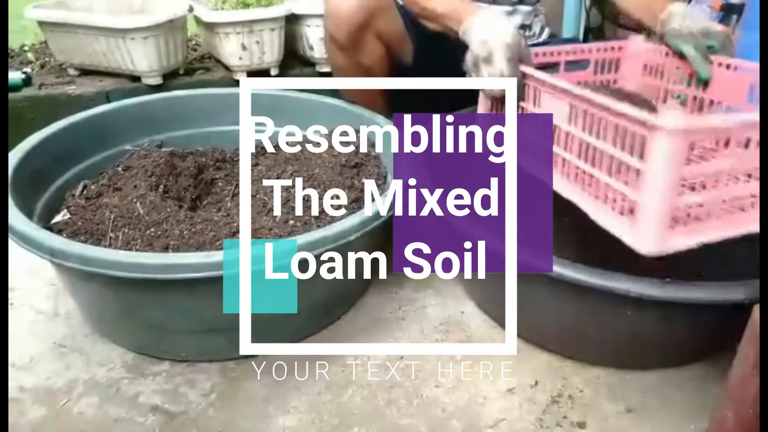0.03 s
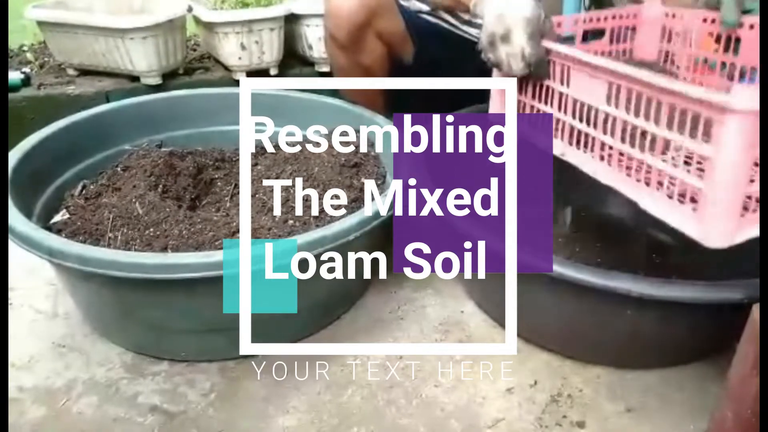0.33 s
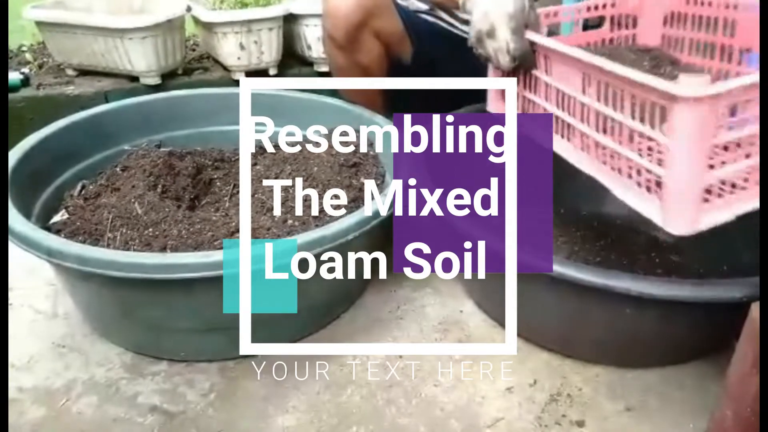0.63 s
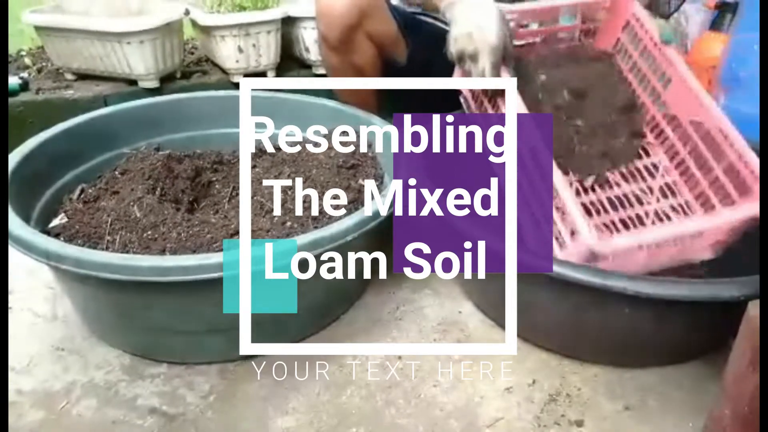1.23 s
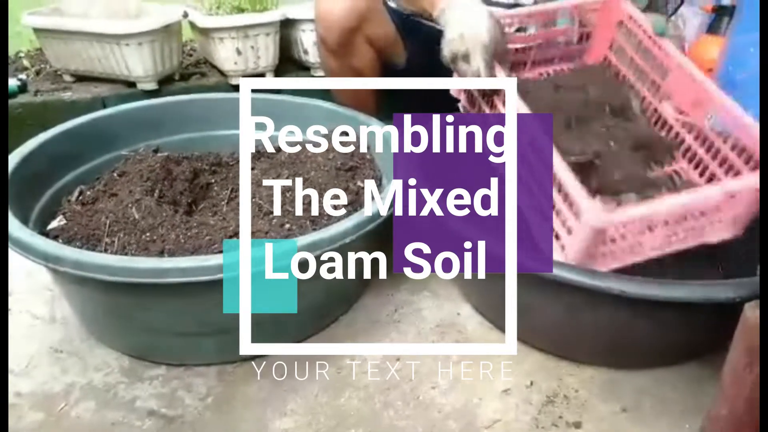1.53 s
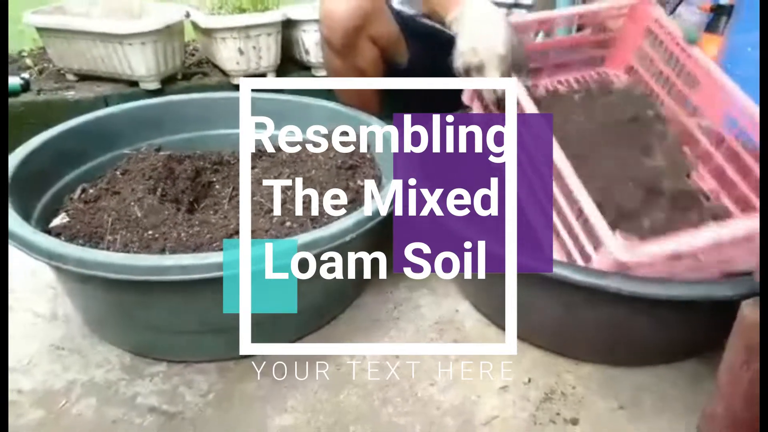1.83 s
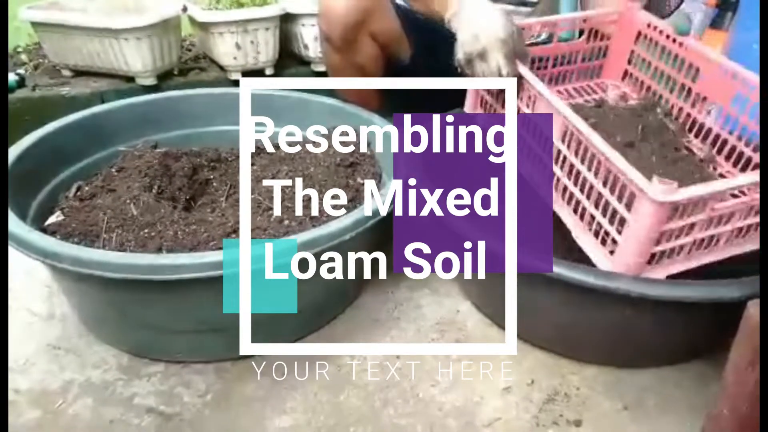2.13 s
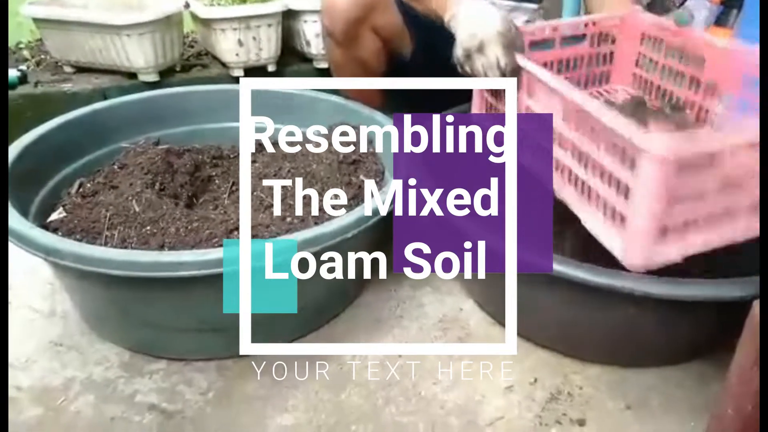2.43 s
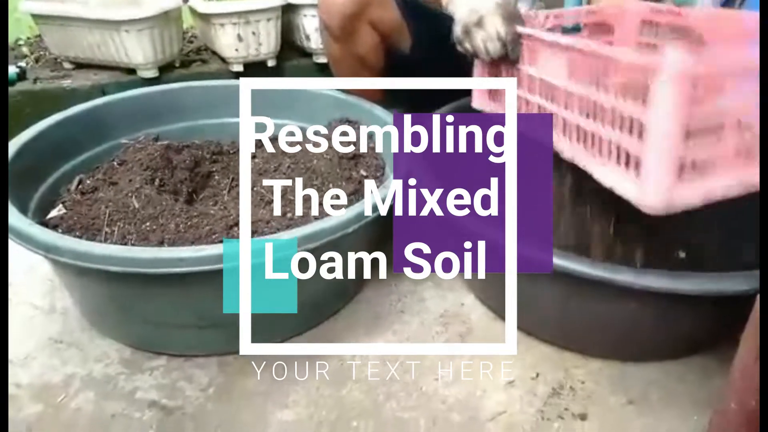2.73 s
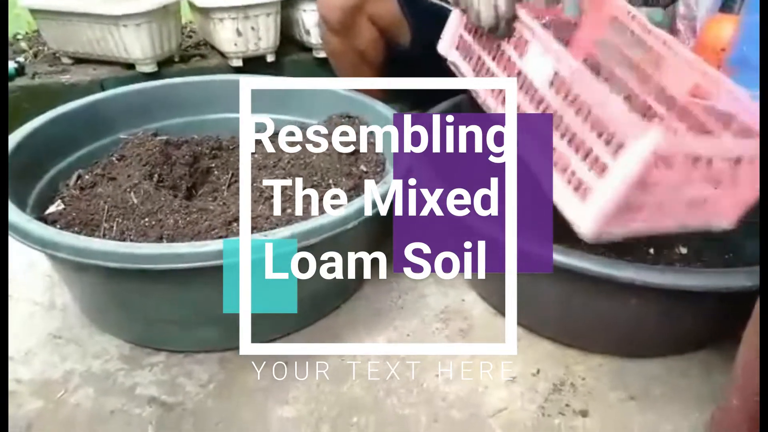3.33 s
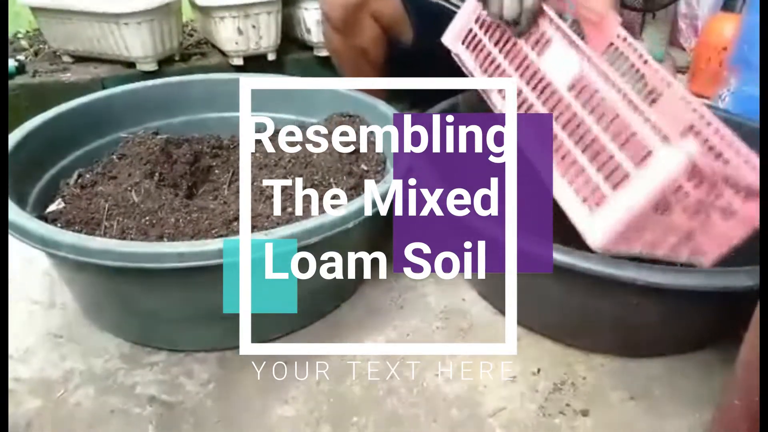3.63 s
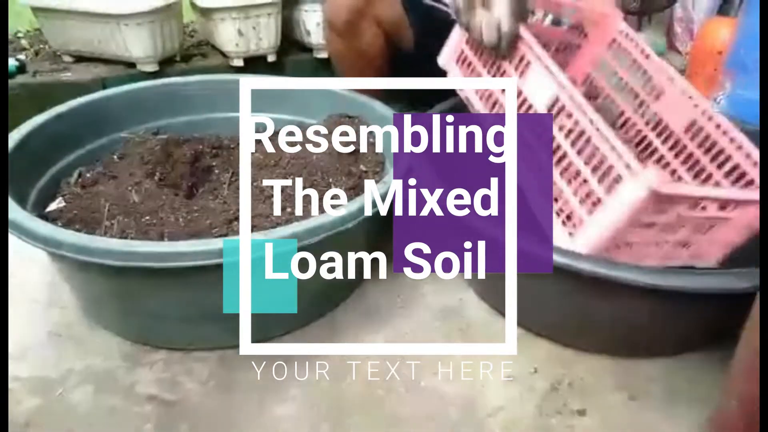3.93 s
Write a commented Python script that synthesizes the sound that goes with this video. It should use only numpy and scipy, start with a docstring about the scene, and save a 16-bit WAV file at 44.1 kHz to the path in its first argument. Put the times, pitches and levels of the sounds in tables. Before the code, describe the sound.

Soil hisses through a shaken plastic crate while clods roll and the crate knocks on a tub's rim. The plastic groans, pauses, then shakes on with a hollow boom, slightly to the right in still outdoor air.

```python
"""Hissing, tumbling and knocking: loose soil is sieved in a plastic crate over a tub, outdoors.
Fine grains hiss through the slots, crumbs tick on the slats and clods roll on the crate's floor.
The shaken crate knocks on the rim, its lattice clacks, and once it lands heavily on the booming tub.
Loaded plastic groans; two brief, thin, flickering high tones sound near 0.8 s.
The shaking rests for a moment while the crate is tipped."""
import sys
import numpy as np
from scipy import signal
from scipy.fft import rfft, irfft, next_fast_len
from scipy.io import wavfile

SR = 44100
rng = np.random.default_rng(int(sys.argv[2]) if len(sys.argv) > 2 else 0)


def unload_wav(signal):
    """Save mono or channel-first audio to the path in sys.argv[1] as 16-bit WAV at rate SR, clipped to [-1, 1]."""
    wavfile.write(
        sys.argv[1],
        SR,
        np.round(np.clip(np.atleast_2d(signal).T, -1, 1) * 32767).astype(np.int16),
    )


N = 176400
TIME = np.arange(N) / SR
HIT_T = np.arange(int(0.2 * SR)) / SR

# soil flow through the slots: t/s, level/dB
SOIL_FLOW = [(0, -33.5), (0.09, -45), (0.2, -32), (0.31, -43.5), (0.44, -41.5), (0.6, -46), (0.68, -51.5),
             (0.85, -62.5), (0.89, -78), (1.0, -97), (1.09, -79), (1.14, -57), (1.2, -50), (1.28, -51),
             (1.36, -31.5), (1.44, -35), (1.51, -42), (1.55, -31.5), (1.59, -35.5), (1.66, -27),
             (1.79, -43), (1.9, -31), (2.0, -34.5), (2.15, -40.5), (2.24, -46), (2.45, -50), (2.56, -34),
             (2.69, -38.5), (2.775, -41), (2.85, -37.5), (2.955, -40), (3.0, -33.5), (3.1, -45),
             (3.26, -37), (3.335, -41), (3.39, -31.5), (3.52, -38), (3.6, -47), (3.69, -35), (3.75, -37),
             (3.81, -38), (3.86, -34), (4.0, -35.5)]
# crate modes: f/Hz, level/dB, t60/s
CRATE_MODES = [(301.4, -11, 0.25), (554, -7.5, 0.42), (613, 2.5, 0.11), (722, 2, 0.072), (808, 1, 0.1),
               (900, -1, 0.16), (1006, 1, 0.088), (1300, -3.5, 0.048), (1401, -1.5, 0.16)]
# stereo width: f/Hz, side over mid/dB
STEREO_WIDTH = [(50, -17), (200, -13), (450, -7), (800, -5), (1100, 1.5), (1600, 2.5), (12000, 0)]


def from_db(db):
    """Decibels to gain."""
    return 10 ** (np.asarray(db) / 20)


def unit_rms(x):
    """Scale to unit power."""
    return x / np.sqrt(np.mean(x ** 2) + 1e-20)


def unit_hit(x):
    """Scale to unit power over the first 12 ms."""
    return x / np.sqrt(np.mean(x[:, :int(0.012 * SR)] ** 2))


def envelope(curve):
    """Gain over time from rows of t/s, level/dB."""
    return from_db(np.interp(TIME, *np.transpose(curve)))


def db_at(spectrum, hz):
    """Read a spectrum on a log-frequency axis."""
    knots_hz, db = np.transpose(spectrum)
    return np.interp(np.log(hz + 1), np.log(knots_hz), db)


def decay(t, t60_s):
    """Exponential decay."""
    return np.exp(-np.log(1000) * t / max(t60_s, 1e-3))


def drift(corner_hz):
    """Slow random wander of spread 1."""
    step, settle = 40, 500
    pole = np.exp(-2 * np.pi * corner_hz * step / SR)
    noise = rng.standard_normal(N // step + settle + 2)
    slow = signal.lfilter([1], [1, -2 * pole, pole * pole], noise)[settle:]
    return np.interp(np.arange(N) / step, np.arange(len(slow)), unit_rms(slow))


def coloured(pair, spectrum, focus_hz=1000, focus_db=0, tilt_db_oct=0):
    """Minimum-phase filter with a broad peak and treble tilt; mid and side in, left and right out."""
    n = pair.shape[1]
    size = 2 * next_fast_len(n // 2 + 2048)
    hz = np.arange(size // 2 + 1) * SR / size
    peak_db = focus_db * np.exp(-(2 * np.log2((hz + 1) / focus_hz)) ** 2)
    treble_db = tilt_db_oct * np.log2(np.maximum(hz / 2500, 1))
    cepstrum = irfft(np.log(from_db(db_at(spectrum, hz) + peak_db + treble_db)))
    cepstrum[1:size // 2] *= 2
    cepstrum[size // 2 + 1:] = 0
    width = from_db(db_at(STEREO_WIDTH, hz))
    mid, side = rfft(pair, size) * np.exp(rfft(cepstrum)) / np.hypot(1, width)
    return irfft(np.array([mid + width * side, mid - width * side]))[:, :n]


def ring(force, hz, t60_s):
    """Resonator: a unit click starts a decaying sine of height 1."""
    r, w = from_db(-60 / (t60_s * SR)), 2 * np.pi * hz / SR
    return signal.lfilter([0, np.sin(w)], [1, -2 * r * np.cos(w), r * r], force + 1e-18)


def mode_pair(hz, t60_s):
    """One decaying mode; left and right differ in phase by the stereo width."""
    offset = np.arctan(from_db(db_at(STEREO_WIDTH, hz))) * rng.choice([-1, 1]) * np.array([[1], [-1]])
    return np.sin(2 * np.pi * (hz * HIT_T + rng.random()) + offset) * decay(HIT_T, t60_s)


def grains(per_s, t60_s, spread_db, dust_share):
    """Random impacts of uneven size, each a tiny noise burst, over smooth dust."""
    sizes = from_db(spread_db * np.minimum(rng.exponential(1, N), 5))
    impacts = rng.random(N) < per_s / SR
    power = signal.lfilter([1], [1, -decay(2 / SR, t60_s)], impacts * sizes ** 2 + 1e-18)
    return np.sqrt(dust_share + (1 - dust_share) * power / power.mean()) * rng.standard_normal((2, N))


def burst(attack_s, t60_s, tail_db):
    """Dense ring of one blow, with a tail of scatter from the tub and the yard."""
    fall = np.hypot(decay(HIT_T, t60_s), from_db(tail_db) * decay(HIT_T, t60_s=0.27))
    return (1 - np.exp(-HIT_T / attack_s)) * fall * rng.standard_normal((2, len(HIT_T)))


def add(out, start_s, sound):
    """Mix a sound in at its time."""
    i = int(start_s * SR)
    out[:, i:i + sound.shape[1]] += sound[:, :N - i]


def air():
    """Still outdoor air: faint, steady noise."""
    # air spectrum: f/Hz, level/dB
    spectrum = [(25, -17), (110, 4.5), (250, -17), (600, -20), (1500, -19), (5000, -19), (13000, -42)]
    return from_db(-76.5) * unit_rms(coloured(rng.standard_normal((2, N)), spectrum))


def groans_and_thin_tones():
    """Loaded plastic groans; two brief, thin, flickering high tones sound near 0.8 s."""
    # groans and the two tones above 1500 Hz: t/s, length/s, start f/Hz, end f/Hz, level/dB
    glides = [(0.331, 0.15, 599, 499, -39.5), (0.538, 0.33, 397, 396, -43.5), (0.672, 0.1, 517, 515, -42),
              (0.788, 0.081, 5060, 5180, -47), (0.81, 0.053, 1830, 1780, -52.5),
              (1.148, 0.1, 1020, 960, -58)]
    out, flicker_hz = 0, 42
    for start_s, length_s, start_hz, end_hz, db in glides:
        progress = np.clip((TIME - start_s) / length_s, 0, 1)
        phase = 2 * np.pi * np.cumsum(start_hz + (end_hz - start_hz) * progress) / SR
        tone = unit_rms(drift(flicker_hz) * np.sin(phase) + drift(flicker_hz) * np.cos(phase))
        swell = 2 * np.sqrt(progress * (1 - progress))
        out += from_db(db) * swell * tone
    return out


def tub():
    """The tub booms under the landing crate and rumbles under falling soil."""
    # crate landings: t/s, level/dB
    landings = [(1.815, -3.5), (1.8315, -11.5), (2.97, -23), (3.452, -21), (3.973, -32)]
    # tub modes: f/Hz, level/dB, t60/s
    modes = [(81, -16.5, 0.25), (116.5, -19, 0.2), (179.3, -14.5, 0.2), (305, 11, 0.019), (404, 2, 0.025),
             (521, 3, 0.055), (750, -2, 0.042)]
    # rumble under the soil: t/s, level/dB
    rumble_curve = [(0, -48.5), (0.25, -43), (0.36, -65), (0.57, -71), (0.85, -66), (0.92, -92), (1.1, -88),
                    (1.27, -75), (1.35, -34), (1.53, -46), (1.63, -39.5), (1.78, -41.5), (1.88, -31.5),
                    (2.15, -45.5), (2.23, -66), (2.44, -56), (2.54, -28), (2.7, -46), (2.98, -44.5),
                    (3.13, -50), (3.46, -35), (3.62, -50.5), (3.74, -49), (4.0, -35.5)]
    # tub noise spectrum: f/Hz, level/dB
    spectrum = [(20, -46), (45, -31.5), (75, 5), (110, 7.5), (150, 3.5), (210, 9.5), (320, 18.5),
                (700, -26)]
    out = np.zeros((2, N))
    boom = sum(from_db(db) * np.sin(2 * np.pi * hz * HIT_T) * decay(HIT_T, t60_s)
               for hz, db, t60_s in modes)
    boom *= np.exp(-HIT_T / 0.004) - 1
    for start_s, db in landings:
        blow = burst(attack_s=0.00082, t60_s=0.067, tail_db=-18)
        rattle = unit_hit(coloured(blow, spectrum, focus_hz=467, focus_db=21))
        add(out, start_s, from_db(db) * (boom + from_db(-14) * rattle))
    soil = grains(per_s=40, t60_s=0.059, spread_db=2.2, dust_share=0.44)
    rumble = from_db(1) * envelope(rumble_curve) * unit_rms(coloured(soil, spectrum))
    # the tub still rings, unevenly, as the scene opens
    hum_hz, hum_fade_s = 114, 0.12
    hum_db = -34 + 4 * drift(corner_hz=25)
    hum = from_db(hum_db) * np.sin(2 * np.pi * hum_hz * TIME) * np.exp(-(TIME / hum_fade_s) ** 2)
    return out + hum + rumble


def clacks():
    """The lattice catches on the rim and snaps free: a crack, ringing ribs, then duller scatter."""
    # lattice snaps: t/s, relative level/dB, treble tilt/(dB/octave), t60/s
    snaps = [(0.002, -28, -2.5, 0.032), (0.1569, -33.5, -2.5, 0.03), (0.1779, -20, -3, 0.0095),
             (0.2354, -32.5, 5, 0.045), (0.285, -32, -34, 0.006), (0.3257, -31, -1, 0.012),
             (0.511, -38, -11, 0.023), (1.296, -35.5, -6, 0.032), (1.318, -24.5, 0.5, 0.036),
             (1.3396, -32.5, -2, 0.027), (1.3803, -34.5, 8, 0.028), (1.5227, -28, -2.5, 0.039),
             (1.5847, -32, -11, 0.035), (1.6039, -23.5, 8, 0.076), (1.6147, -20, 3.5, 0.075),
             (1.744, -26, 1, 0.055), (1.8132, -26, 4, 0.032), (1.8683, -20, -1, 0.015),
             (2.101, -29.5, 5, 0.078), (2.4921, -28.5, -5.5, 0.026), (2.518, -30, 6, 0.049),
             (2.5295, -21.5, 8, 0.043), (2.75, -27.5, 1.5, 0.021), (2.791, -21.5, 0, 0.024),
             (2.814, -19.5, -3.5, 0.055), (2.833, -26.5, 3, 0.049), (2.9708, -18, 3.5, 0.013),
             (3.019, -24, -2, 0.061), (3.0793, -33.5, 4.5, 0.041), (3.2089, -32.5, -22, 0.042),
             (3.35, -26.5, -8.5, 0.11), (3.3875, -32, 4, 0.023), (3.509, -25.5, -6.5, 0.005),
             (3.729, -19.5, -2.5, 0.12), (3.931, -29.5, 4, 0.043), (3.971, -21.5, 0, 0.099)]
    # clack spectrum: f/Hz, level/dB
    spectrum = [(100, -19), (600, 2), (1500, 1.5), (3000, 2.5), (5000, 5), (6800, -3.5), (8500, -10.5),
                (13000, -22)]
    gain_db, attack_s, crack_delay_s, crack_width_s = 5, 0.0007, 0.0018, 0.0013
    out = np.zeros((2, N))
    lowpass = signal.butter(4, 6500, fs=SR, output="sos")
    rise = 1 - np.exp(-HIT_T / attack_s)
    crack_shape = np.exp(-((HIT_T - crack_delay_s) / crack_width_s) ** 2)
    for start_s, db, tilt, t60_s in snaps:
        ribs = rise * sum(mode_pair(hz, t60_s=0.032) for hz in rng.uniform(1500, 12000, size=12))
        crack = crack_shape * rng.standard_normal((2, len(HIT_T)))
        scatter = signal.sosfilt(lowpass, burst(attack_s, t60_s, tail_db=-9))
        snap = scatter + from_db(-7) * unit_hit(ribs) + from_db(-1.5) * crack
        add(out, start_s, from_db(db + gain_db) * unit_hit(coloured(snap, spectrum, tilt_db_oct=tilt)))
    return out


def knocks():
    """A struck panel rings and wakes nearby crate modes; the shifting load damps and detunes them."""
    # dull blows on the rim: t/s, relative level/dB, panel f/Hz, t60/s
    blows = [(0.158, -27, 950, 0.029), (0.177, -13, 787, 0.038), (0.186, -12.5, 682, 0.054),
             (0.333, -17.5, 1030, 0.027), (0.564, -18, 720, 0.027), (1.316, -16.5, 905, 0.035),
             (1.338, -10, 828, 0.046), (1.363, -18, 730, .045), (1.521, -18.5, 930, 0.019),
             (1.602, -11.5, 970, 0.052), (1.647, -16, 858, 0.19), (1.672, -18.5, 564, 0.032),
             (1.714, -16.5, 847, 0.023), (1.814, -11, 1046, 0.036), (1.906, -11.5, 594, 0.026),
             (1.931, -16, 746, 0.061), (1.966, -10.5, 1062, 0.043), (2.045, -21.5, 1020, 0.03),
             (2.13, -9.5, 1307, 0.021), (2.376, -27, 940, 0.036), (2.476, -13, 624, 0.1),
             (2.493, -7.5, 567, 0.072), (2.508, -12.5, 996, 0.046), (2.551, -12, 970, 0.095),
             (2.567, -15.5, 557, 0.063), (2.752, -10, 549, 0.065), (2.793, -13, 1304, 0.037),
             (2.957, -16.5, 800, 0.032), (2.971, -10.5, 1024, 0.013), (3.261, -15.5, 835, 0.07),
             (3.308, -18.5, 1400, 0.024), (3.403, -13, 924, 0.036), (3.448, -10, 798, 0.05),
             (3.485, -16, 362, 0.094), (3.701, -15, 1040, 0.078), (3.731, -10, 1310, 0.033),
             (3.838, -13, 832, 0.077), (3.883, -21, 710, 0.042), (3.935, -18, 796, 0.024),
             (3.972, -6, 845, 0.056)]
    # thud spectrum: f/Hz, level/dB
    spectrum = [(30, -40), (150, -21.5), (300, -8.5), (550, -10), (1000, 1.5), (1500, -6), (2500, -12),
                (6000, -47.5)]
    gain_db, attack_s, falloff_db_oct = -6, 0.0015, 10
    free_t60_s = 0.06   # a blow this long leaves the modes their own t60
    out = np.zeros((2, N))
    rise = 1 - np.exp(-HIT_T / attack_s)
    for start_s, db, panel_hz, t60_s in blows:
        thud = coloured(burst(attack_s, t60_s, tail_db=-18), spectrum, focus_hz=panel_hz, focus_db=3)
        rings = 0
        for hz, mode_db, mode_t60_s in CRATE_MODES:
            drive_db = mode_db - falloff_db_oct * abs(np.log2(hz / panel_hz)) + rng.normal(0, 1.7)
            detuned_hz = hz * rng.normal(1, 0.012)
            rings += from_db(drive_db) * mode_pair(detuned_hz, mode_t60_s * t60_s / free_t60_s)
        panel = mode_pair(panel_hz, 1.09 * t60_s)
        knock = unit_hit(thud) + from_db(-3) * unit_hit(rise * rings) + unit_hit(rise * panel)
        add(out, start_s, from_db(db + gain_db) * unit_hit(knock))
    return out


def tumbling():
    """Clods roll over the crate's floor and set its modes ringing."""
    # clod motion: t/s, level/dB
    motion = [(0, -28.5), (0.1, -39), (0.21, -26.5), (0.27, -49.5), (0.44, -30.5), (0.52, -40), (0.58, -29),
              (0.67, -44), (0.74, -38), (0.85, -58), (0.9, -75.5), (1.0, -93), (1.12, -82), (1.18, -61.5),
              (1.27, -43), (1.36, -26), (1.48, -36.5), (1.56, -34), (1.66, -22), (1.78, -32), (1.92, -23),
              (2.05, -33), (2.18, -32.5), (2.26, -50.5), (2.45, -40.5), (2.53, -21.5), (2.62, -32.5),
              (2.72, -40), (2.82, -34.5), (2.89, -35.5), (3.0, -30.5), (3.08, -48.5), (3.15, -40.5),
              (3.24, -31), (3.33, -32), (3.47, -28.5), (3.58, -41.5), (3.66, -40.5), (3.73, -30),
              (3.81, -47), (3.86, -26.5), (4.0, -31)]
    # clod impact spectrum: f/Hz, level/dB
    spectrum = [(100, -20.5), (200, -19), (330, -5), (550, 4), (950, 6.5), (1300, 5), (2000, -5.5),
                (4000, -29)]
    force = coloured(grains(per_s=290, t60_s=0.045, spread_db=2.5, dust_share=0.1), spectrum)
    rings = sum(from_db(db) * ring(force, hz, t60_s) for hz, db, t60_s in CRATE_MODES)
    return from_db(-1) * envelope(motion) * unit_rms(unit_rms(force) + from_db(-5) * unit_rms(rings))


def crunching():
    """Coarse crumbs in the sliding soil tick one by one, each on a few of the slats."""
    # slat modes: f/Hz
    slats_hz = [1840, 2237, 2750, 3047, 3305, 4170, 4764, 5340, 5820]
    crumbs_per_s, spread_db = 220, 14
    crumbs = (rng.random(N) < crumbs_per_s / SR) * from_db(spread_db * rng.random(N))
    ticks = 0
    for hz in slats_hz:
        struck = rng.random(N) < 0.5
        ticks += ring(crumbs * struck * rng.standard_normal((2, N)), hz, t60_s=0.014)
    return from_db(1) * envelope(SOIL_FLOW) * unit_rms(ticks)


def sifting():
    """Fine grains of six sizes hiss through the slots, each size in its own band and its own clumps."""
    # hiss spectrum: f/Hz, level/dB
    spectrum = [(300, -30.5), (900, 3), (1800, -7), (3200, -2.5), (5000, -2.5), (6600, -5.5), (8000, -13.5),
                (10000, -17), (13000, -25)]
    edges_hz = [250, 1500, 2500, 3700, 5200, 7500, 14000]
    hiss = 0
    for band_hz in zip(edges_hz, edges_hz[1:]):
        ticks = grains(per_s=700, t60_s=0.018, spread_db=3.2, dust_share=0.3)
        clumps_db = 3.5 * np.clip(drift(corner_hz=25), -2, 2)
        bandpass = signal.butter(2, band_hz, "band", fs=SR, output="sos")
        hiss += signal.sosfilt(bandpass, unit_rms(ticks * from_db(clumps_db)))
    return from_db(6.5) * envelope(SOIL_FLOW) * unit_rms(coloured(hiss, spectrum))


def scene():
    """Soil, crate and tub sit a little to the right, over still air."""
    left_lag_s = 0.00008
    soil = sifting() + crunching() + tumbling()
    left, right = soil + groans_and_thin_tones() + knocks() + clacks() + tub()
    late_left = np.roll(left, int(left_lag_s * SR)) * (TIME > left_lag_s)
    return np.array([late_left, right]) + air()


def record(dry):
    """The highest peaks clip and the top is cut."""
    cutoff_hz = 13200
    lowpass = signal.ellip(10, 0.3, 70, cutoff_hz, fs=SR, output="sos")
    return signal.sosfilt(lowpass, np.clip(dry, -1, 1))


dry = scene()
out = record(dry)
unload_wav(out)
```